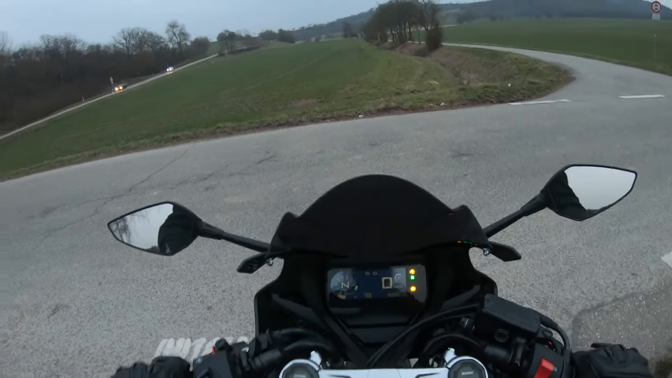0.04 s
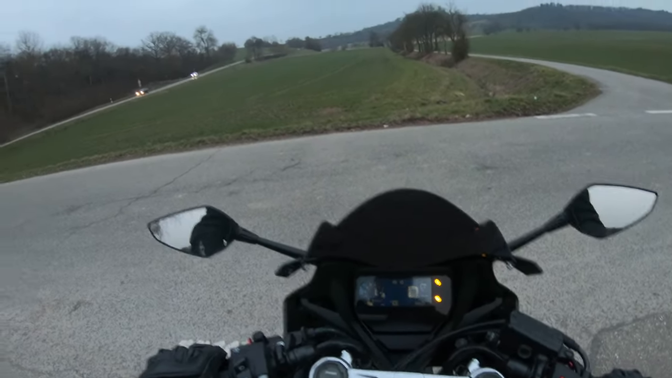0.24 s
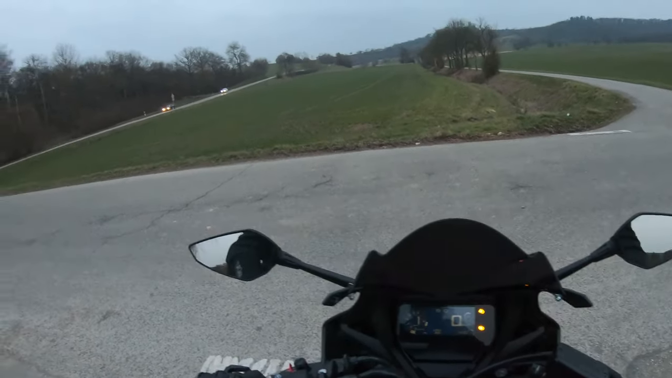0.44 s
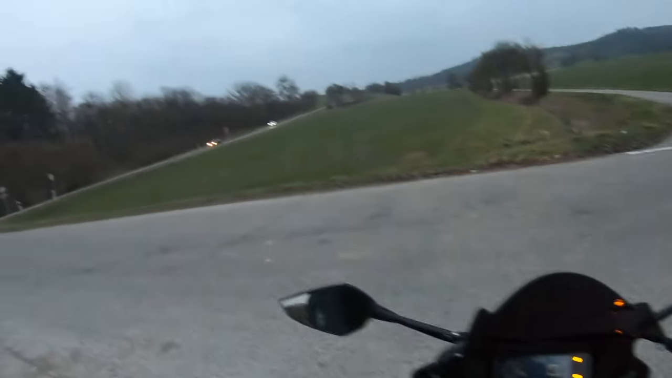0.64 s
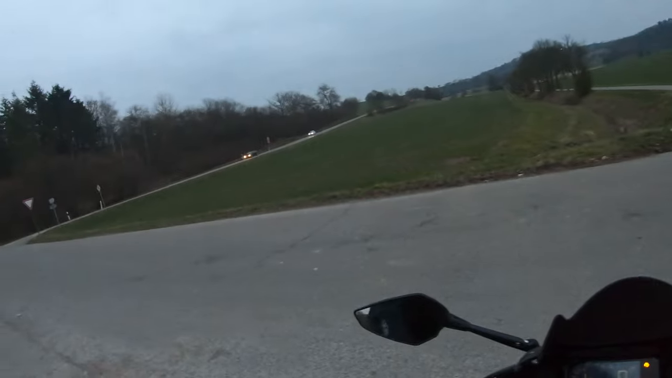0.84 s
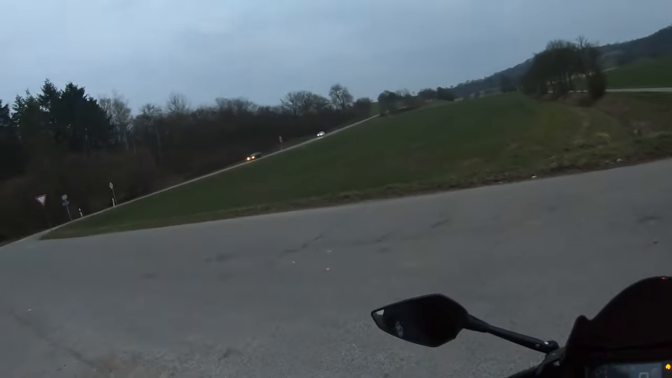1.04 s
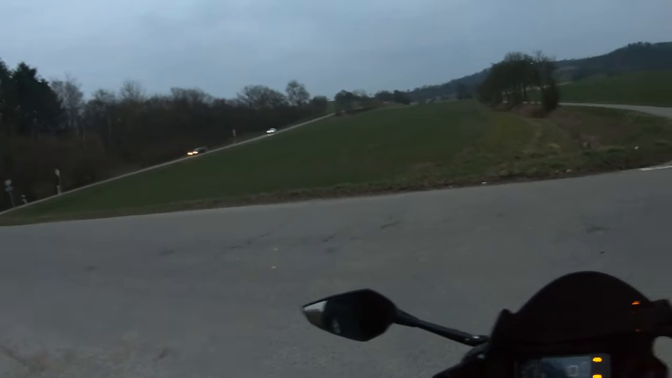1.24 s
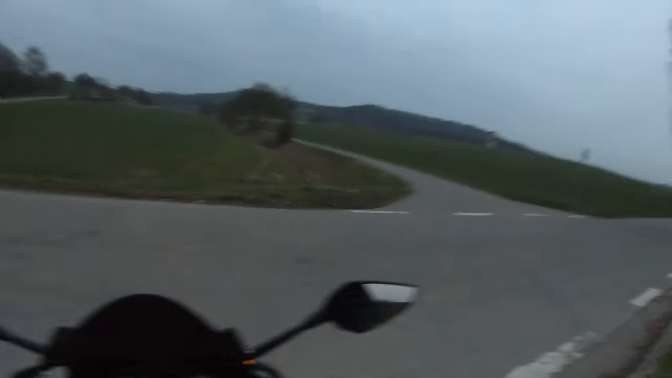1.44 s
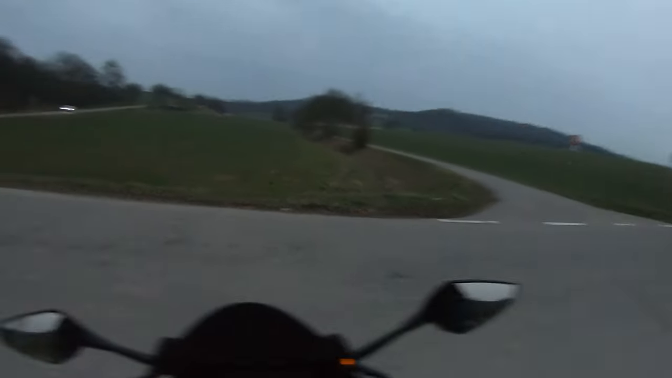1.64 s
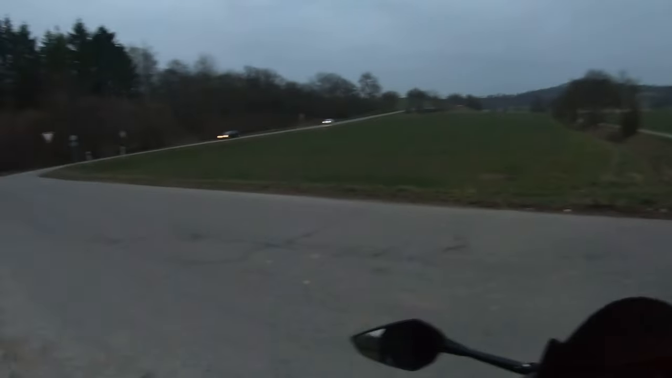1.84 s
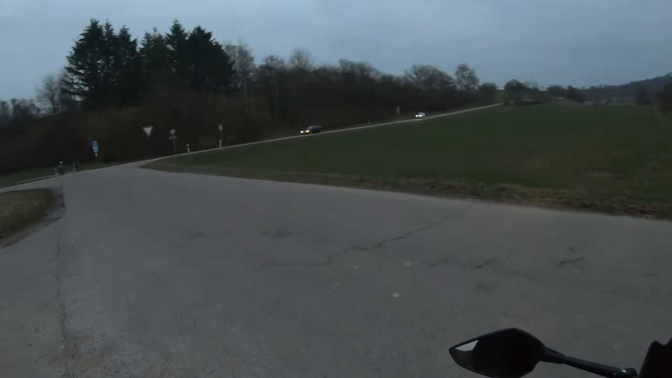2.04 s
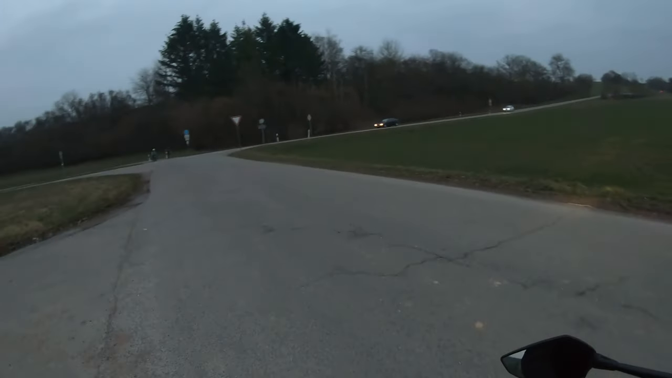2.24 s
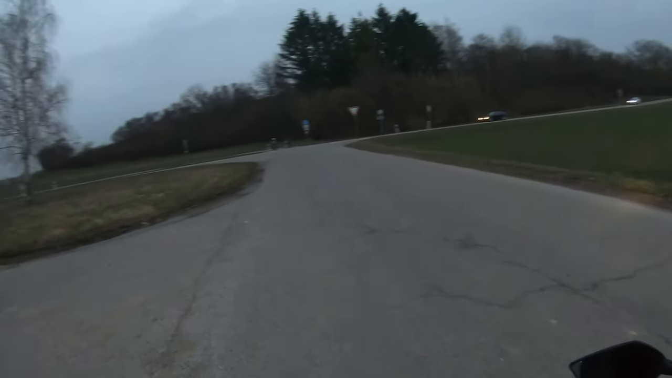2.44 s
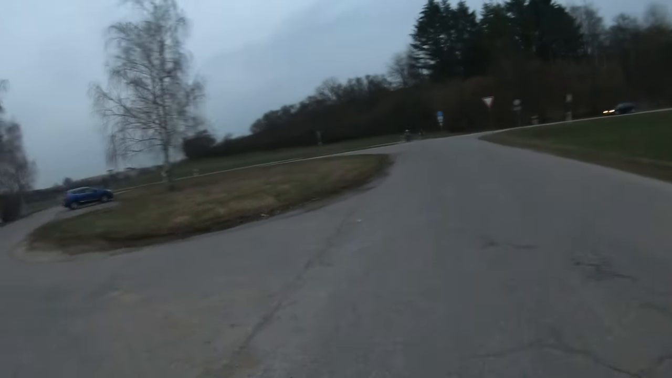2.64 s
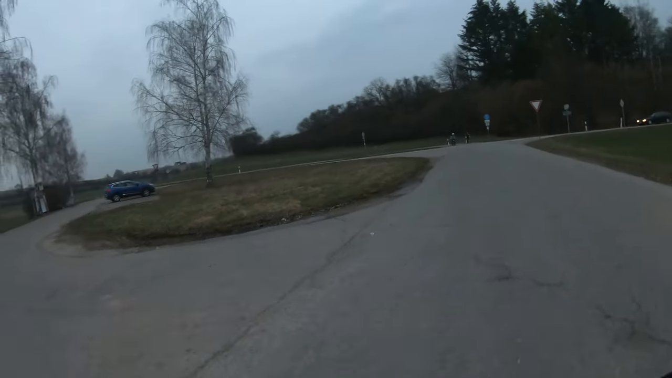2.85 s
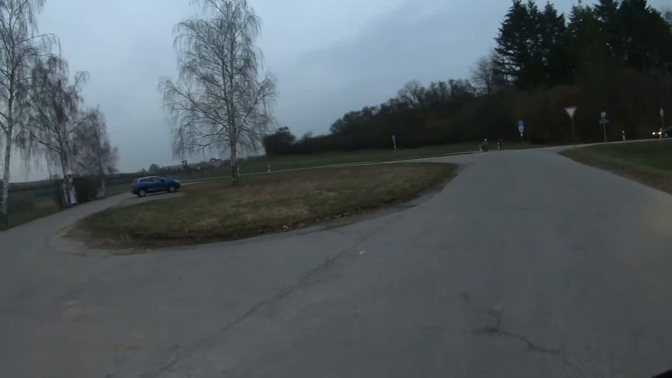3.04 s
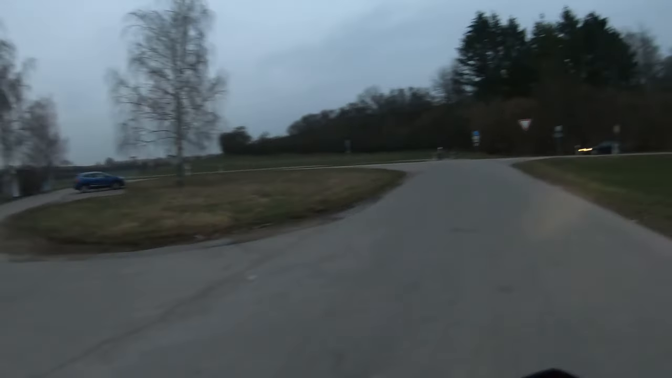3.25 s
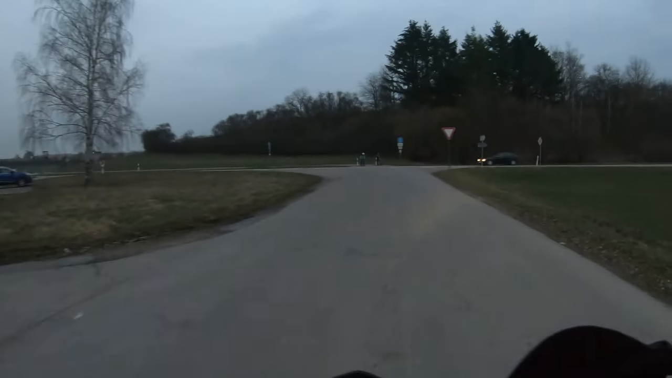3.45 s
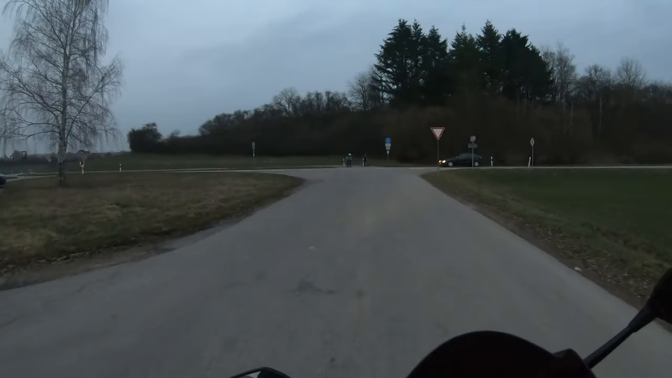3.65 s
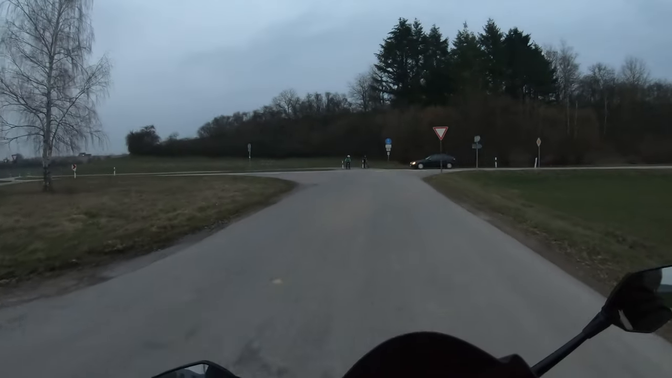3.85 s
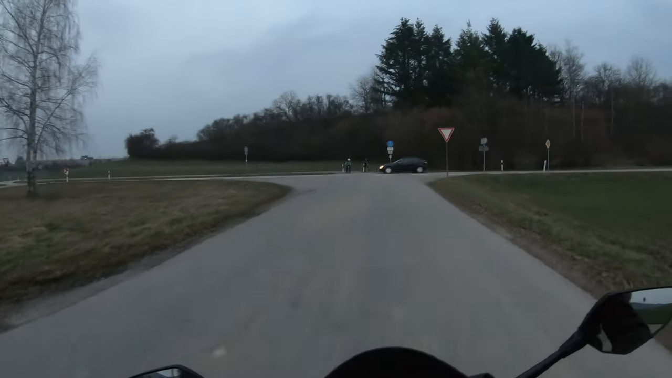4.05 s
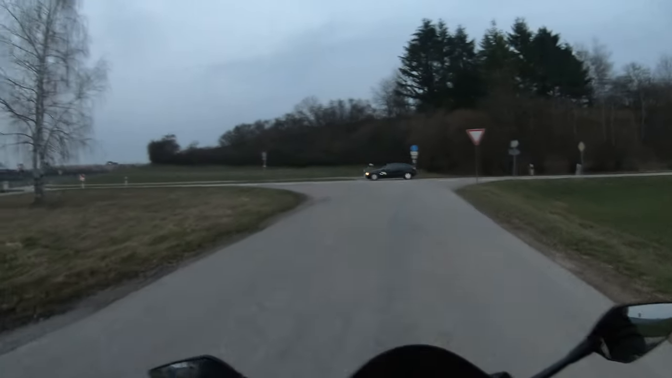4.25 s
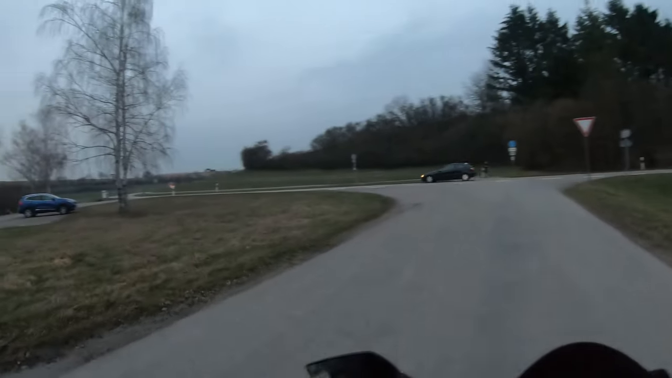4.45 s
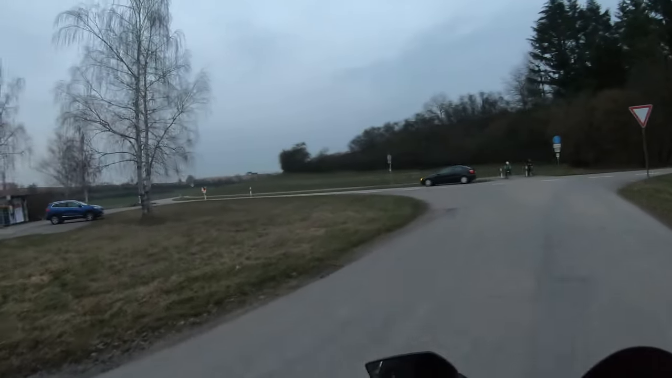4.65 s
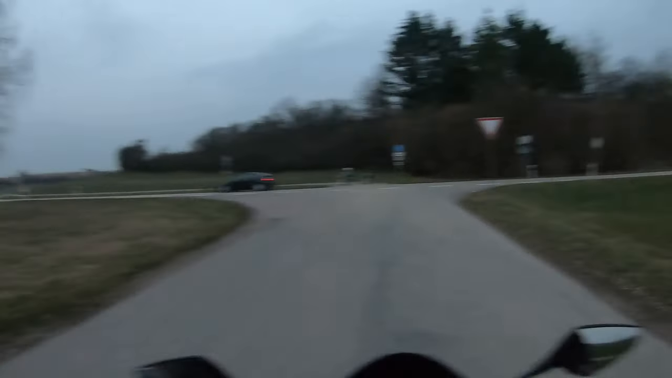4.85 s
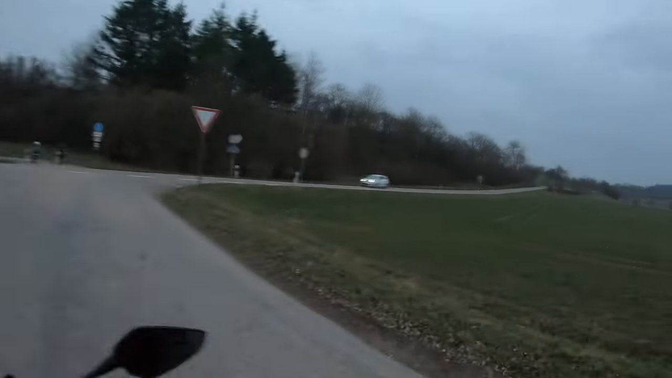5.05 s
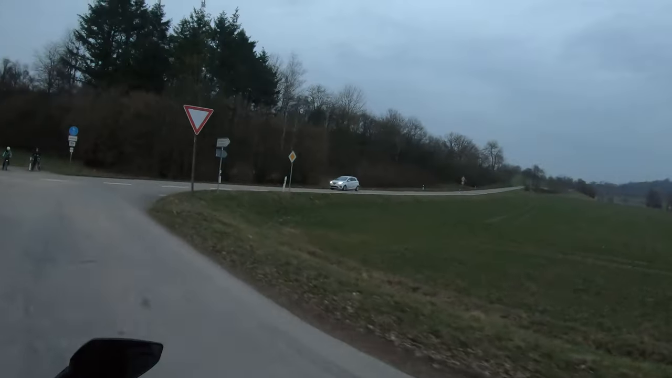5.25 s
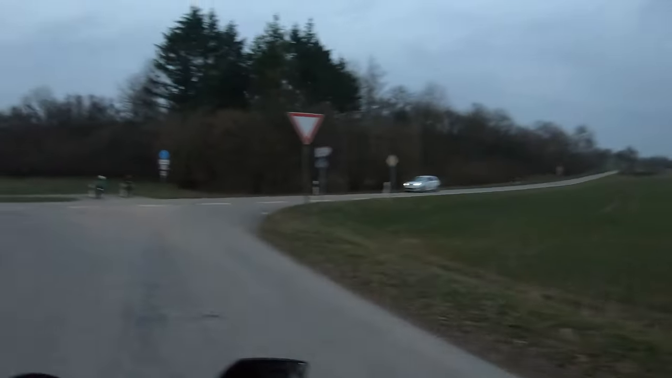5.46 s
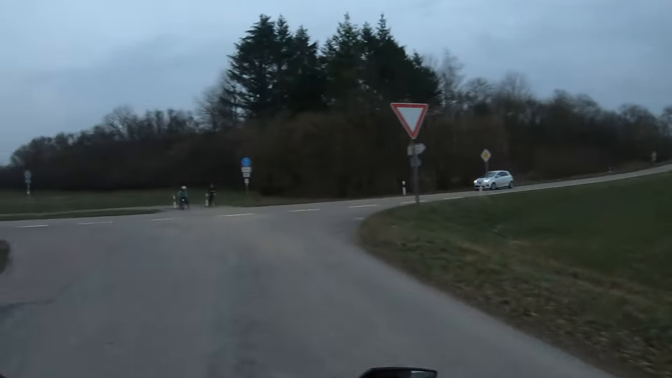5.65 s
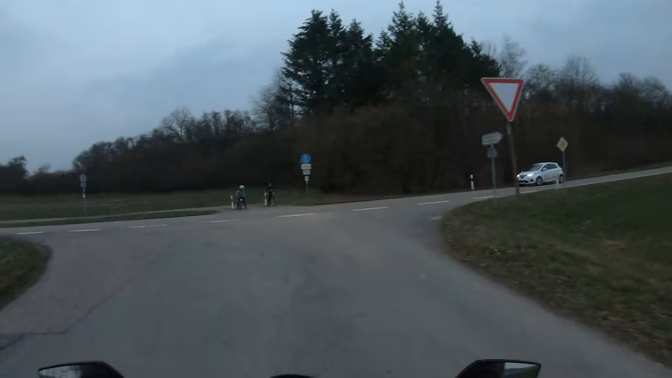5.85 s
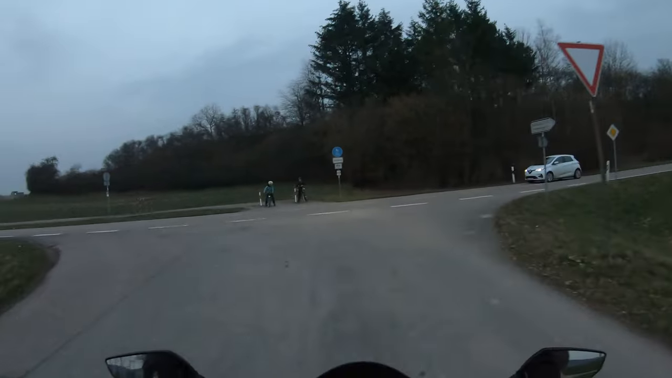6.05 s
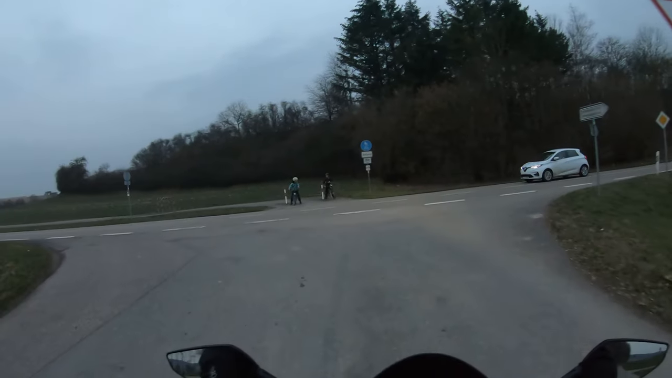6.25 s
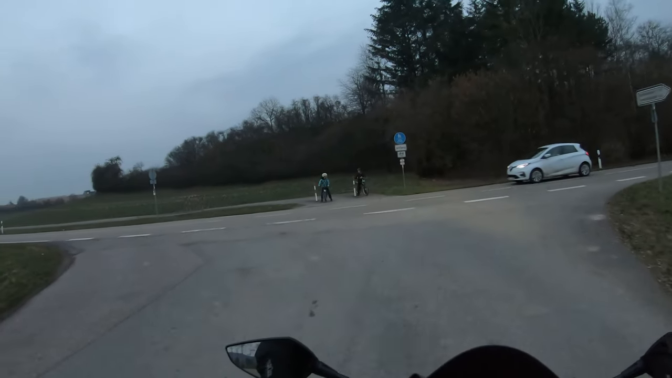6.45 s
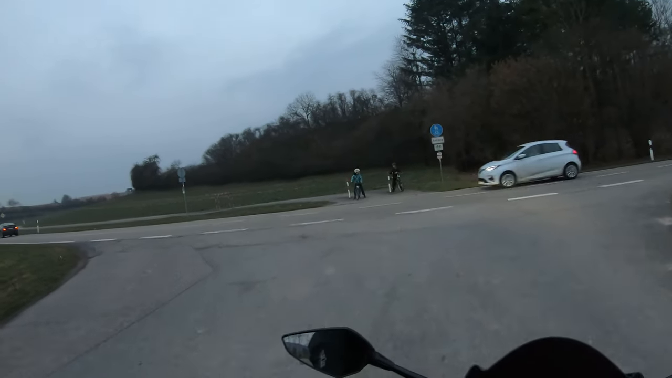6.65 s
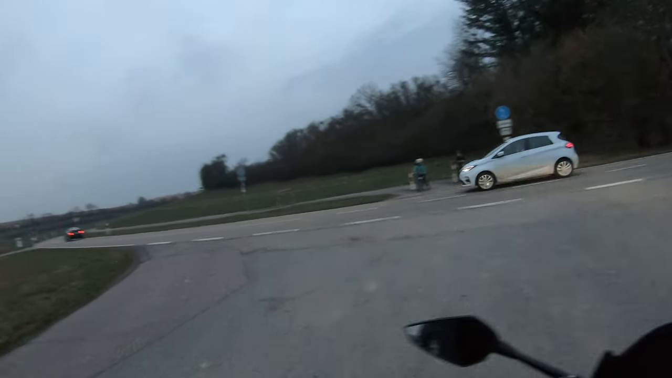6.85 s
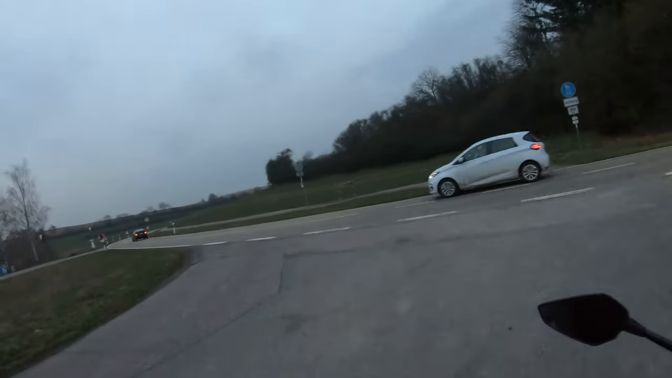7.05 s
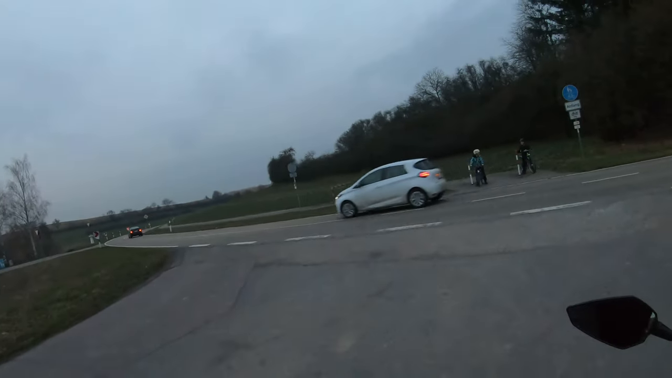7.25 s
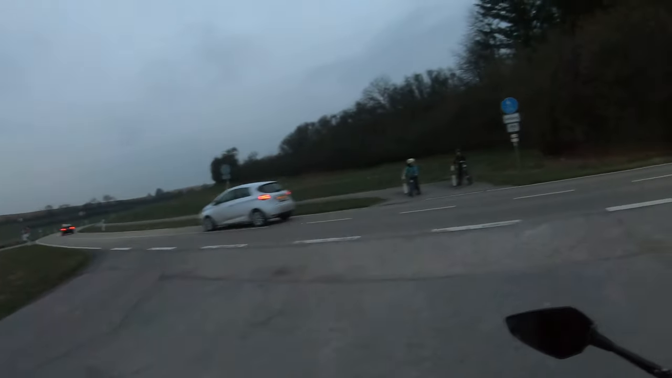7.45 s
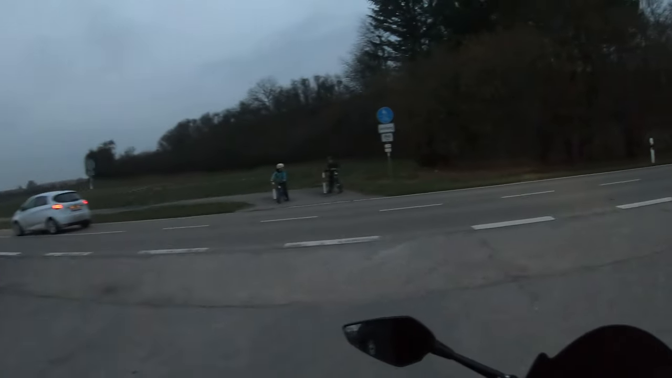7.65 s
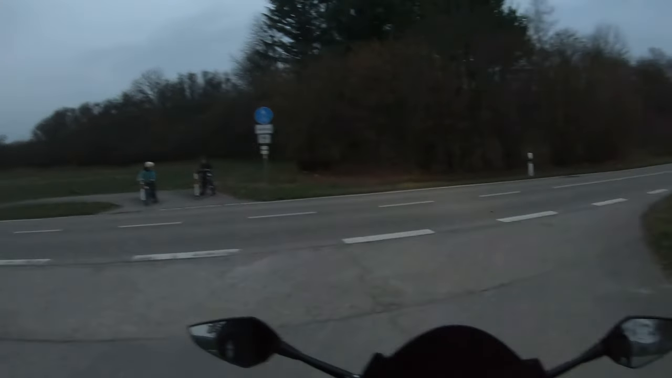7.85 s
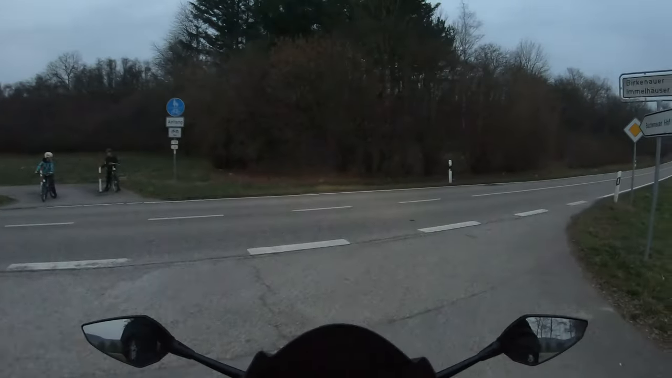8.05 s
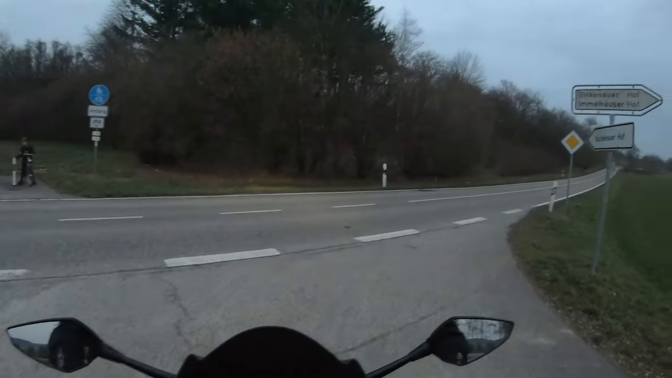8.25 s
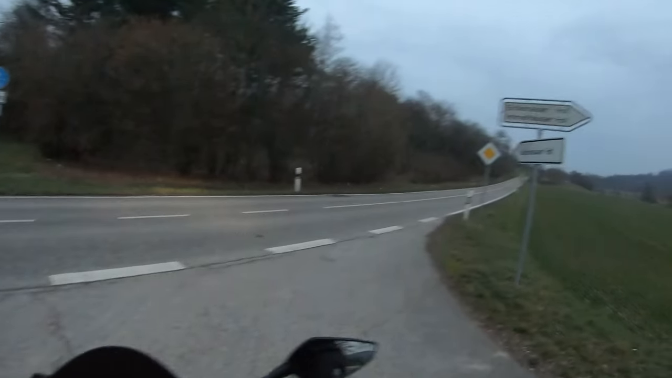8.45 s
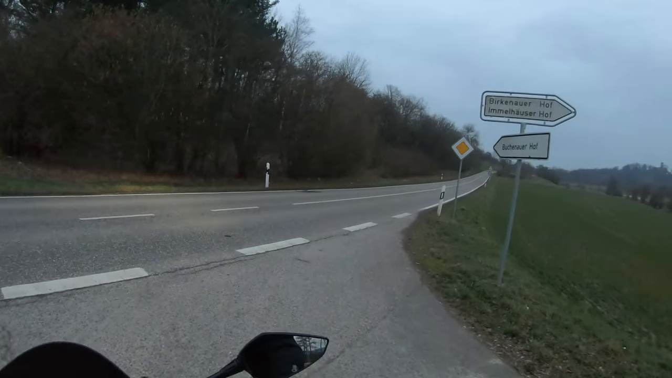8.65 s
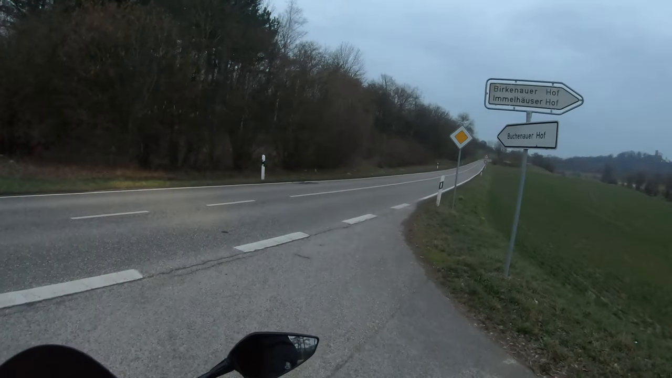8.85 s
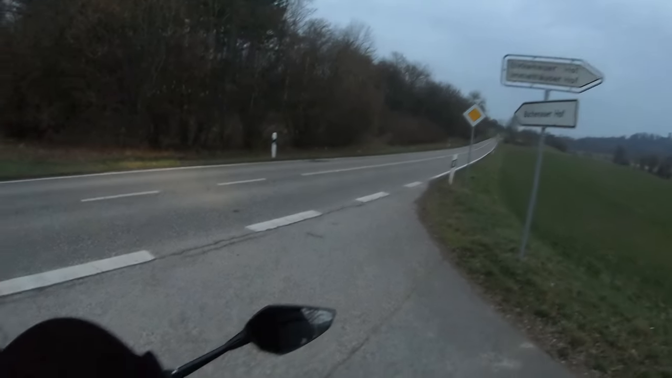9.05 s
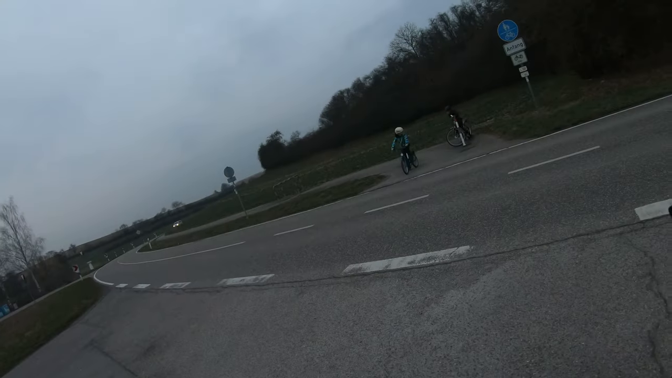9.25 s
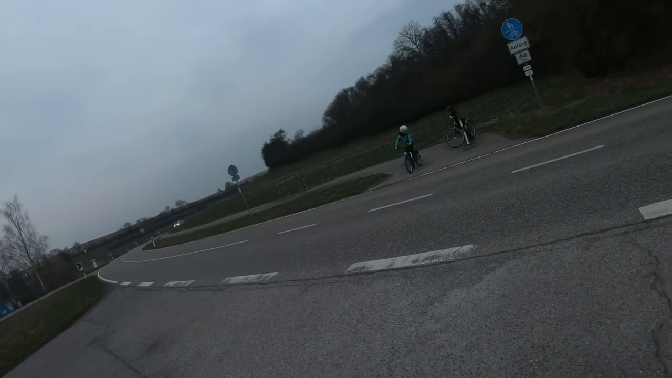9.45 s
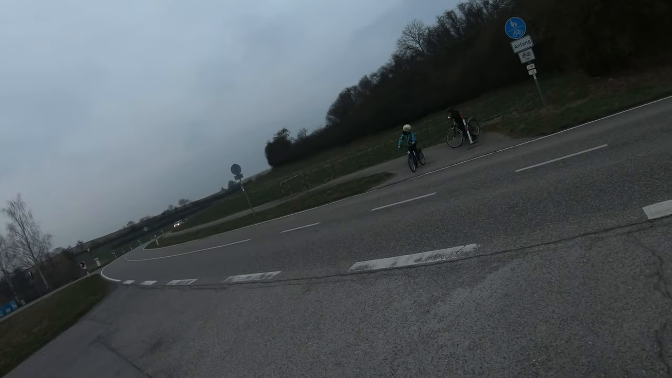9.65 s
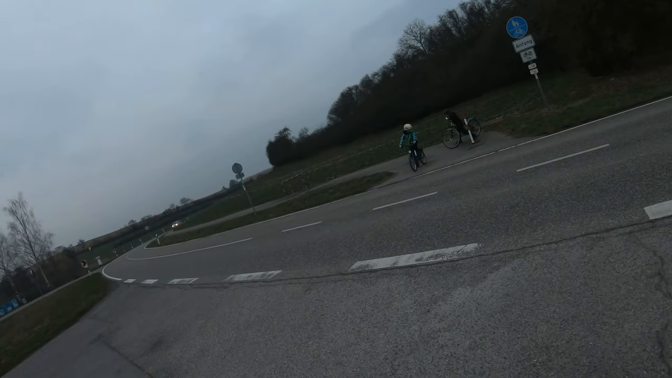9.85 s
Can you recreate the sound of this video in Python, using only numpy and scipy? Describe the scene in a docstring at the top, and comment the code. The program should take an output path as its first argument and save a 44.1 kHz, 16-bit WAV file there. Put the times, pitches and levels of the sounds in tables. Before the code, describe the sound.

A four-cylinder motorcycle heard from the rider's helmet outdoors. Its revs fall to a thudding idle while the visor knocks shut, then it pulls away with fairing rattle and accelerates, deep and throaty. The throttle closes, bringing uneven burbles, stronger wind and a thin brake ring. It settles to a lumpy idle as a car's tyres rush past, and the revs start rising at the end.

```python
"""An engine thuds as its speed falls and a helmet visor knocks shut: a four-cylinder motorcycle, from the rider's
helmet. It pulls away, accelerates, burbles on a closed throttle and idles at a junction while a car passes.
Each firing is a pulse that makes a thud, rings the exhaust and draws through the airbox; gears are wavering sines.
Clatter, wind, tyres, visor and brake are shaped noise; the tallest pulses overload the microphone."""
import sys
import numpy as np
from scipy import signal
from scipy.fft import rfft, irfft, next_fast_len
from scipy.io import wavfile
from scipy.ndimage import uniform_filter1d

SR = 44100
rng = np.random.default_rng(int(sys.argv[2]) if len(sys.argv) > 2 else 0)


def log_audio(samples):
    """Write samples as a 16-bit WAV file to the path given in sys.argv[1]."""
    # one column per channel
    frames = np.atleast_2d(samples).T
    # limit to full scale, then quantise
    limited = np.clip(frames, -1, 1)
    pcm = np.round(limited * 32767).astype(np.int16)
    wavfile.write(sys.argv[1], SR, pcm)


N = 437031
TIME = np.arange(N) / SR


def undb(db):
    """Decibels to gain."""
    return 10 ** (np.asarray(db) / 20)


def curves(table):
    """Each column of a table, joined by straight lines in time."""
    time_s, *columns = np.transpose(table)
    return [np.interp(TIME, time_s, column) for column in columns]


def steady(x, span_s=0.087):
    """Bring the running rms close to 1."""
    size = int(span_s * SR)
    power = uniform_filter1d(uniform_filter1d(x * x, size), size)
    return x / np.sqrt(power + 1e-12)


def noise(spectrum):
    """Noise of rms 1 with the given colour."""
    hz, db = np.transpose(spectrum)
    size = next_fast_len(N)
    bin_hz = np.fft.rfftfreq(size, 1 / SR)
    gain = undb(np.interp(np.log(bin_hz + 1), np.log(hz), db))
    x = irfft(rfft(rng.standard_normal(size)) * gain, size)[:N]
    return x / x.std()


def walk(rate_hz):
    """Smooth random curve with a spread near 1."""
    size = int(SR / rate_hz)
    steps = np.repeat(rng.standard_normal(N // size + 1), size)
    return 1.3 * uniform_filter1d(steps, size)[:N]


def cut(x, hz, kind, order=2):
    """Low-pass or high-pass."""
    return signal.sosfilt(signal.butter(order, hz, kind, fs=SR, output="sos"), x + 1e-18)


def muffle(x, hz, order=2):
    """Low-pass that rounds pulses evenly on both flanks."""
    return signal.sosfiltfilt(signal.butter(order, hz, fs=SR, output="sos"), x + 1e-18, padtype=None)


def ring(x, modes):
    """Resonances side by side."""
    return sum(undb(db) * signal.lfilter(*signal.iirpeak(hz, hz / width_hz, fs=SR), x + 1e-18)
               for hz, width_hz, db in modes)


def pulses(times_s, sizes):
    """Impulses, each shared between two neighbouring samples."""
    at = np.clip(times_s * SR, 0, N - 2)
    i = at.astype(int)
    sizes = sizes * (i > 0) * (i < N - 2)
    return np.bincount(i, sizes * (1 - at + i), N) + np.bincount(i + 1, sizes * (at - i), N)


def burst(start_s, length_s, attack_s=0.011, release_s=0.0082):
    """Swell up to the start, hold, then die away."""
    swell = np.clip(1 + (TIME - start_s) / attack_s, 0, 1)
    return swell * np.exp(-np.clip(TIME - start_s - length_s, 0, 1) / release_s)


# lone misfires, and at 9.2 s a longer dip as the rider turns his head (time [s], length [s], thud change [dB],
# bark change [dB])
MISFIRES = [(.145, 0.1, -2.5, -8), (.4, 0.069, -4, -10), (.533, 0.041, -15, -13), (.715, 0.029, -2, -3),
            (4.54, .018, -13, -2), (4.593, 0.017, -10.5, 1.5), (8.122, 0.021, -9.5, -9),
            (9.2, 0.14, -7.5, -11)]
# burbling runs (start [s], end [s], first gap [s], gap growth [ratio], mean thud change [dB], mean bark change [dB])
BURBLES = [(5.33, 5.84, .046, 1.08, -7, -6), (5.912, 6.73, .0975, 1, -12.5, 1),
           (6.772, 7.55, .084, 1.075, -11.5, -9)]
BURBLE_LENGTH_S, BURBLE_SCATTER_DB = 0.037, 2.7


def stumbles():
    """Misfires, a head-turn dip, and burble beats at even or widening gaps: columns time_s, length_s, thud_db,
    bark_db."""
    rows = list(MISFIRES)
    for time_s, end_s, gap_s, growth, thud_db, bark_db in BURBLES:
        for thud_scatter_db, bark_scatter_db in BURBLE_SCATTER_DB * rng.standard_normal(size=(16, 2)):
            if time_s < end_s:
                rows.append((time_s, BURBLE_LENGTH_S, thud_db + thud_scatter_db, bark_db + bark_scatter_db))
            time_s += max(gap_s, BURBLE_LENGTH_S)
            gap_s *= growth
    return np.transpose(rows)


# closed throttle (start [s], end [s])
COAST_S = (4.5, 6.9)
# direct exhaust wave and reflections (delay in hot gas [s], share [gain])
EXHAUST_PATHS = [(0, 0.52), (.003, .35), (.0048, 0.28), (.0066, .26)]
# exhaust resonances (frequency [Hz], width [Hz], relative level [dB])
EXHAUST_MODES = [(213, 110, 9.5), (509, 47, 5.5)]
# silencer resonance (frequency [Hz], width [Hz], relative level [dB])
SILENCER_MODES = [(465, 34, -5.5)]
# airbox resonances (frequency [Hz], width [Hz], relative level [dB])
AIRBOX_MODES = [(589, 61, 6), (730, 260, 1), (1035, 350, 1)]
# turbulent gas spectrum (frequency [Hz], relative density [dB per Hz])
GAS_SPECTRUM = [(50, -19), (110, -2.5), (230, -0.5), (380, -3.5), (500, -8.5), (620, -25), (1200, -71.5)]
# firing scatter in even running and near a stumble; reach of that unrest
EVEN_DB, UNEVEN_DB, UNREST_S = .35, 1.7, .1
THUD_LAG_S, INTAKE_LAG_S = 0.00313, 0.0018


def engine(phase, firing_hz, thud_db, bark_db, intake_db):
    """Each firing sends a push-pull wave down the exhaust, a low-pressure thud and a gulp through the airbox."""
    count = np.arange(1, int(phase[-1]) + 1)
    times_s = np.interp(count, phase, TIME)
    chance = rng.standard_normal((len(times_s), 4)).T
    stumble_s, length_s, thud_step_db, bark_step_db = stumbles()
    apart_s = abs(times_s[:, None] - stumble_s)
    inside = np.interp(apart_s / length_s, [.3, .7], [1, 0])
    rough_db = np.interp(apart_s.min(1), [UNREST_S / 2, UNREST_S], [UNEVEN_DB, EVEN_DB])

    # the cylinders differ in strength and timing
    cylinder_db = np.array([0.99, -.5, -0.27, -1.7])[count % 4]
    cylinder_lag_s = np.array([.00004, .00001, -.00002, -.00003])[count % 4]
    times_s = times_s + cylinder_lag_s + .00007 * rough_db ** 2 * chance[0]
    # on a closed throttle the cylinders suck before they push
    stroke = np.where((times_s > COAST_S[0]) & (times_s < COAST_S[1]), -1, 1)
    size = stroke * undb(cylinder_db + rough_db * chance[1] + inside @ bark_step_db)

    # cool gas at idle carries the reflections more slowly
    slow = np.interp(np.interp(times_s, TIME, firing_hz), [42, 65, 100], [1.18, 1, 1])
    wave = sum(pulses(times_s + delay_s * slow, share * size) for delay_s, share in EXHAUST_PATHS)
    rung = wave + ring(wave, EXHAUST_MODES)
    bark = np.gradient(muffle(muffle(rung, hz=530.3, order=7), hz=257, order=1))
    # rounder wave at low engine speed
    sharp = np.interp(firing_hz, [42, 80], [.2, 1])
    bark = sharp * bark + (1 - sharp) * muffle(bark, hz=432, order=3)
    # unburnt mixture goes off in the silencer
    burn_size = (stroke < 0) * (0.32 + inside.sum(1)) * size * np.tanh(2 * chance[3])
    burns = pulses(times_s, burn_size)
    bark = bark + .13 * muffle(ring(burns, SILENCER_MODES), hz=560, order=4)

    thud_size = undb(cylinder_db + .5 * rough_db * chance[2] + inside @ thud_step_db)
    thud = pulses(times_s + stroke * THUD_LAG_S, thud_size)
    thud = muffle(thud, hz=206.6, order=3) - muffle(thud, hz=24.6)
    gulps = ring(pulses(times_s + INTAKE_LAG_S, size), AIRBOX_MODES)
    intake = steady(cut(gulps, hz=1204, kind="low", order=4), span_s=.15)
    # gas flutters with each firing
    gas = steady(noise(GAS_SPECTRUM) * (1 + 0.19 * np.cos(2 * np.pi * phase)))
    gas_db = 0.63 * bark_db - 12.5
    exhaust = gas * undb(gas_db) + steady(bark, span_s=0.15) * undb(bark_db)
    return exhaust + intake * undb(intake_db) - steady(thud, span_s=0.18) * undb(thud_db - 0.5)


# fairing bursts (start [s], length [s], rattle level [dB], buzz level [dB])
FAIRING_BURSTS = [(0.046, 0.066, -25, -50), (1.003, 0.2, -23, -51), (1.377, 0.072, -26, -52),
                  (1.536, 0.075, -22, -50.5), (1.723, 0.054, -24, -56), (1.804, 0.099, -29, -52.5),
                  (2.028, 0.03, -32, -69), (4.8, 1.0, -27.5, -56), (6.6, 0.71, -41, -66.5)]


def fairing():
    """Gains of the fairing's rattle and buzz, summed over the bursts."""
    return sum(undb([[rattle_db], [buzz_db]]) * burst(start_s, length_s)
               for start_s, length_s, rattle_db, buzz_db in FAIRING_BURSTS)


# valve gear and gas spectrum (frequency [Hz], relative density [dB per Hz])
CLATTER_SPECTRUM = [(200, -8), (450, 8), (620, 4), (820, 2.5), (1100, -10), (1550, -14.5), (1780, -13),
                    (2100, -25), (3000, -32.5), (4200, -38), (8000, -59.5)]
# fairing panel resonances (frequency [Hz], width [Hz], relative level [dB])
PANEL_MODES = [(1890, 130, 2), (2060, 230, -0.5), (3500, 340, -0.5), (4480, 110, 1.5), (4900, 130, -3),
               (5740, 180, -11.5), (7300, 920, -17.5), (9700, 600, -19.5), (12300, 770, -12.5)]


def clatter(phase, clatter_db):
    """Valve gear and gas rustle once a firing; the fairing panels buzz, louder in short uneven bursts."""
    beat = .5 + .5 * np.cos(2 * np.pi * (phase - .1))
    rustle = steady(noise(CLATTER_SPECTRUM) * (5.4 + beat) * undb(1.3 * walk(60)))
    chatter = rng.standard_normal(N) * (0.56 + beat ** 2) * undb(2.9 * walk(61))
    panels = muffle(ring(chatter, PANEL_MODES), hz=7500, order=1)
    buzz = steady(cut(panels, hz=1200, kind="high"))
    rattle_gain, buzz_gain = fairing()
    return rustle * np.hypot(undb(clatter_db), rattle_gain) + buzz * np.hypot(undb(clatter_db - 37), buzz_gain)


# chain, following road speed (time [s], tooth rate [Hz])
CHAIN_RATE = [(1.2, 200.5), (2.9, 812), (3.3, 1011), (4.47, 1452), (6.4, 982), (6.85, 888), (7.3, 733),
              (8.5, 199.7)]
PRIMARY_IDLE_DB, PRIMARY_RISE_DB = -56.5, -1  # rise per doubling of engine speed
CHAIN_DB, CHAIN_LOAD_DB, FRAME_HZ, FRAME_WIDTH_HZ = -40.5, 8.5, 870, 200


def gears(phase, doublings, load):
    """Primary gears sing at a multiple of engine speed, the chain with road speed; both waver."""
    mesh = 2 * np.pi * 21.5 * phase + 1.2 * walk(130)
    primary_db = PRIMARY_IDLE_DB + PRIMARY_RISE_DB * doublings
    primary = (np.sin(mesh) + undb(-14.5) * np.sin(2 * mesh)) * undb(primary_db + 3.7 * walk(17))
    tooth_hz, = curves(CHAIN_RATE)
    chain = np.sin(2 * np.pi * np.cumsum(tooth_hz) / SR + .45 * walk(60))
    detuning = (tooth_hz / FRAME_HZ - FRAME_HZ / tooth_hz) * FRAME_HZ / FRAME_WIDTH_HZ
    frame_gain = 1 / np.hypot(1, detuning)
    return primary + chain * frame_gain * undb(CHAIN_DB + CHAIN_LOAD_DB * load + 1.5 * walk(25))


# wind on the helmet (time [s], mean level [dB])
WIND_LEVEL = [(0, -30), (.8, -42.5), (2, -44.5), (2.6, -30.5), (4, -30), (5.7, -17.5), (7.3, -26.5),
              (8, -37.5), (9.9, -40.5)]
# wind spectrum (frequency [Hz], relative density [dB per Hz])
WIND_SPECTRUM = [(15, -11.5), (30, 4.5), (80, -3.5), (200, 3), (500, -18.5), (1000, -36.5), (3000, -85)]
# passing car's tyres (time [s], mean level [dB])
CAR_LEVEL = [(0, -70.5), (6, -67), (7.3, -39.5), (8.3, -38.5), (9.1, -40), (9.25, -50.5), (9.9, -58.5)]
# tyre spectrum (frequency [Hz], relative density [dB per Hz])
TYRE_SPECTRUM = [(200, -7), (700, 2.5), (1200, 2), (1800, -14.5), (2500, -20), (4000, -37), (8000, -55)]
HISS_DB = -84.5


def air():
    """Coloured noise with drifting level for gusty wind and the passing car's tyres, over faint white hiss."""
    wind = noise(WIND_SPECTRUM) * undb(curves(WIND_LEVEL)[0] + 2.5 * walk(9))
    car = noise(TYRE_SPECTRUM) * undb(curves(CAR_LEVEL)[0] + walk(2.7))
    return wind + car + undb(HISS_DB) * rng.standard_normal(N)


# visor knocks (time [s], relative level [dB], chatter length before the faster decay [s])
VISOR_KNOCKS = [(.05, -27, .012), (.072, -25, .02), (.2104, -5, .02), (.2483, -5, .014), (.3082, -7, .02),
                (.3905, -35, .01), (.425, -33, .008), (.442, -24, .02), (.4893, -37, .008)]
# helmet shell resonances (frequency [Hz], width [Hz], relative level [dB])
SHELL_MODES = [(404, 170, 1), (721, 130, 1), (960, 160, -5), (1750, 80, -12), (1940, 70, -16),
               (3420, 700, -26), (4800, 800, -19)]


def visor():
    """The visor hits the helmet shell and chatters briefly: resonant noise under a decay for each knock."""
    push = np.zeros(N)
    for time_s, db, length_s in VISOR_KNOCKS:
        age_s = np.maximum(TIME - time_s, 0)
        decay = np.exp(-age_s / .04 - np.maximum(age_s - length_s, 0) / .012)
        push += undb(db) * np.minimum(age_s / .0002, 1) * decay
    grit = rng.standard_normal(N) * undb(3 * walk(500))
    shell = steady(cut(ring(grit, SHELL_MODES), hz=1080, kind="low"), span_s=.008)
    return undb(-1.3) * push * shell


BUMP_S, BUMP_LENGTH_S, BUMP_DB = 3.195, .04, -18


def bump():
    """A bump in the road thumps the helmet: one short burst of deep noise."""
    rumble = steady(cut(rng.standard_normal(N), hz=70, kind="low"))
    return rumble * undb(BUMP_DB) * burst(BUMP_S, BUMP_LENGTH_S)


# small dry ticks (time [s], relative level [dB])
TICK_LEVELS = [(4.6072, -19), (6.317, -31), (7.7737, -28), (9.2831, -32)]


def ticks():
    """Lone dry ticks: band-limited impulses."""
    time_s, db = np.transpose(TICK_LEVELS)
    clicks = cut(pulses(time_s, undb(db)), hz=3500, kind="low", order=1)
    return 2 * cut(clicks, hz=1200, kind="high")


# thin brake ringing while slowing (start [s], length [s], pitch [Hz], relative level [dB])
BRAKE_SQUEALS = [(5.38, 1.39, 3400, -67), (5.2, 0.66, 5650, -67.5), (6.586, .68, 5800, -72.5),
                 (5.3, 1.95, 10500, -85.5)]
SQUEAL_WIDTH_HZ = 320


def brake(phase):
    """The pads rub unevenly, shaken by each firing, and ring the disc in narrow bands."""
    rub = rng.standard_normal(N)
    flutter = undb(3.3 * walk(60) + 4.3 * np.cos(2 * np.pi * phase) - 2.5)
    squeal = np.zeros(N)
    for start_s, length_s, hz, db in BRAKE_SQUEALS:
        band = ring(ring(rub, [(hz, SQUEAL_WIDTH_HZ, 0)]), [(hz, 4 * SQUEAL_WIDTH_HZ, 0)])
        squeal += steady(band) * undb(db) * burst(start_s, length_s)
    return flutter * squeal


# engine speed (time [s], firing rate [Hz])
ENGINE_SPEED = [(0.0, 85.6), (0.44, 46.84), (0.52, 42.15), (0.77, 40.73), (0.8, 43.09), (0.91, 69.96),
                (1.02, 101.8), (1.1, 107.4), (1.38, 81.22), (1.82, 82.6), (2.4, 61.06), (2.84, 80.43),
                (3.09, 74.67), (3.78, 99.5), (4.44, 119.9), (4.55, 106.1), (4.66, 114.8), (5.91, 92.97),
                (6.51, 81.9), (7.23, 60.7), (7.56, 46.05), (7.86, 42.79), (9.69, 41.58), (9.91, 61.34)]
# engine load (time [s], share [0-1])
ENGINE_LOAD = [(0, 0.56), (.85, 0.8), (1.0, 0.98), (1.35, 0.72), (2.4, 0.71), (3.3, 0.88), (3.8, 0.99),
               (4.2, 0.49), (4.47, 0.61), (4.52, 0.09), (5.15, 0.47), (5.5, 0.03), (6.9, 0.01), (7.5, 0),
               (9.9, 0.35)]
# deep thud (time [s], relative level [dB])
THUD_LEVEL = [(0, -9.5), (.5, -14.5), (.8, -13), (.93, -10.5), (1.15, -11.5), (2.15, -11), (2.38, -12.5),
              (2.75, -7), (3.7, -9), (4.53, -14), (4.78, -7.5), (5.25, -9.5), (5.5, -13), (7.7, -13),
              (9.9, -13.5)]
IDLE_HZ = 42
# level at idle; rise per doubling of engine speed without load; extra rise at full load
BARK_IDLE_DB, BARK_RISE_DB, BARK_LOAD_DB = -21, 4.5, 9
CLATTER_IDLE_DB, CLATTER_RISE_DB, CLATTER_LOAD_DB = -39, 8.5, 4
INTAKE_IDLE_DB, INTAKE_RISE_DB, INTAKE_LOAD_DB = -52, 11, 8


def scene():
    """Sum at the helmet; engine speed and load set the bark, intake and clatter levels."""
    firing_hz, load, thud_db = curves(ENGINE_SPEED) + curves(ENGINE_LOAD) + curves(THUD_LEVEL)
    load = np.clip(load, 0, 1)
    phase = np.cumsum(firing_hz) / SR  # in firings
    doublings = np.log2(firing_hz / IDLE_HZ)
    bark_db = BARK_IDLE_DB + doublings * (BARK_RISE_DB + BARK_LOAD_DB * load)
    intake_db = INTAKE_IDLE_DB + doublings * (INTAKE_RISE_DB + INTAKE_LOAD_DB * load ** 2)
    clatter_db = CLATTER_IDLE_DB + doublings * (CLATTER_RISE_DB + CLATTER_LOAD_DB * load)
    bike = engine(phase, firing_hz, thud_db, bark_db, intake_db)
    bike = bike + clatter(phase, clatter_db) + gears(phase, doublings, load)
    return (bike + air() + visor() + bump() + ticks() + brake(phase))[None]


TOP_HZ = 15800


def record(dry):
    """The microphone flattens the tallest pulses, which makes them crackle; the ends fade and the top is cut."""
    fade = np.clip(np.minimum(TIME, TIME[-1] - TIME) / .002, 0, 1)
    clipped = np.clip(dry, -.98, .98) * fade
    return signal.sosfilt(signal.ellip(8, .2, 70, TOP_HZ, fs=SR, output="sos"), clipped)


dry = scene()
out = record(dry)
log_audio(out)
```